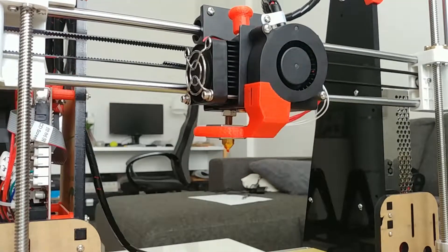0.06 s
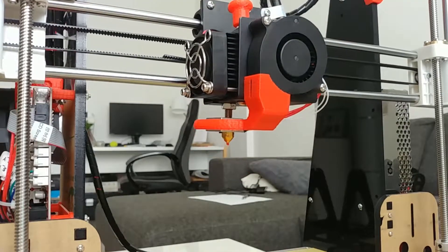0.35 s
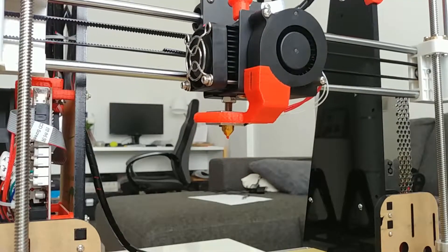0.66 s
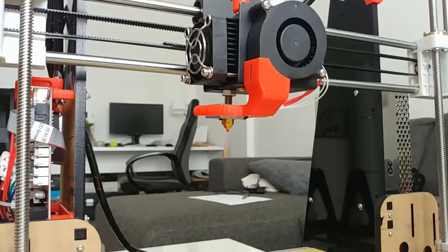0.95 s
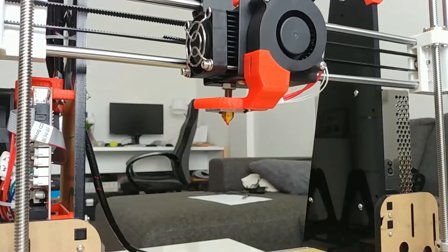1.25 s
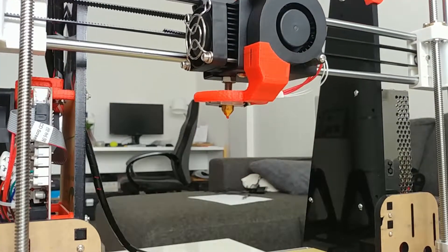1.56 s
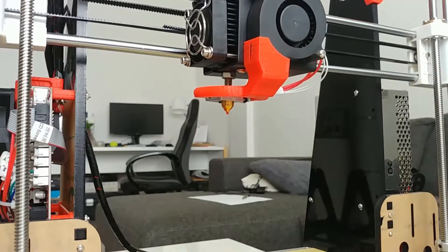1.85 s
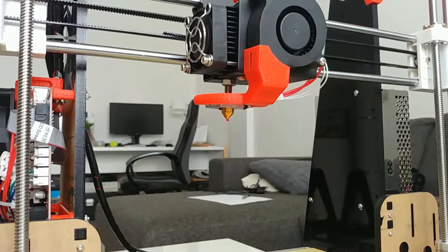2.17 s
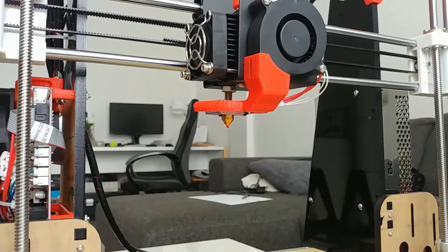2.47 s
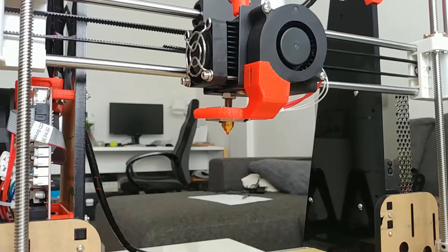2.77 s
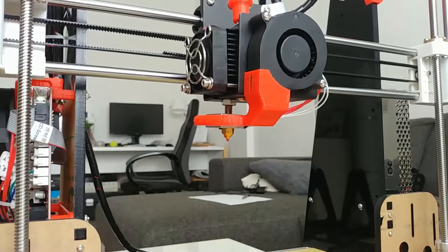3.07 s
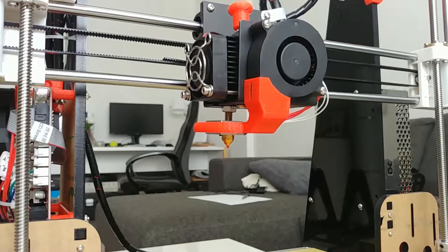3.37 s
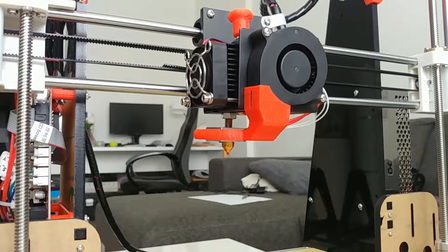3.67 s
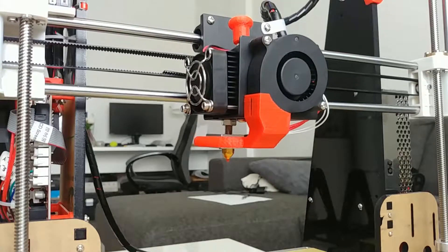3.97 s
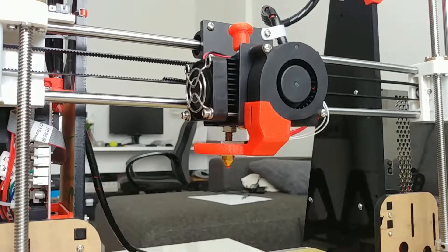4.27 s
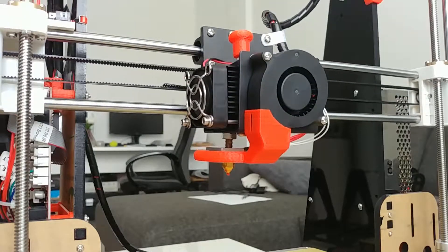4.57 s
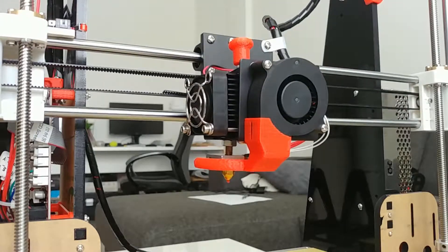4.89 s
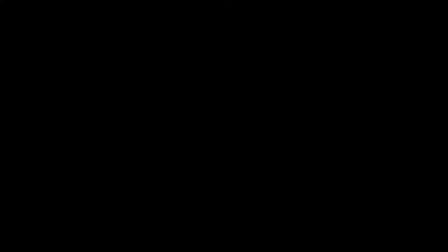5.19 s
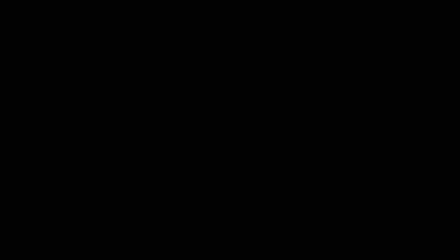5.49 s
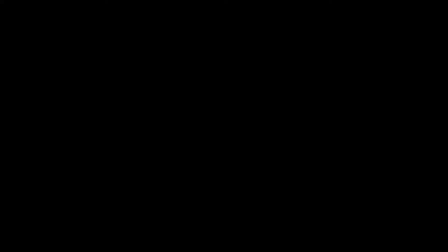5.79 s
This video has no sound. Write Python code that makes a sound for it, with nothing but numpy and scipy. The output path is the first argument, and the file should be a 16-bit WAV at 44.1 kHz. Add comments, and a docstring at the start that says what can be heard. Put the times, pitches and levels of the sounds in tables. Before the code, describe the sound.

A desktop 3D printer works close to the microphone in a room. Its stepper motors give a high, steady whine over a hum, while a small fan sings and blows. A few light clicks come early, the first with a faint low bump. Rubbing on the threaded rods swells as the carriage reaches the top and turns round. The whine carries on as it lowers, joined by a thin, slowly rising whistle.

```python
"""A high motor whine over a hum and a singing fan: a desktop 3D printer at work close by in a room.
It lifts its carriage on two threaded rods, turns round at 2 s and lowers it again. The stepper motors
hum at their step rate and whine at their microstep rate; a small fan sounds its shaft orders and blows
throughout, beside a thin rising whistle. The nuts rub on the rods, most near the top of the travel, and
the frame gives a few clicks and knocks, the first with a faint low bump."""
import sys
import numpy as np
from scipy import signal
from scipy.fft import rfft, irfft, next_fast_len
from scipy.io import wavfile
from scipy.ndimage import map_coordinates

SR = 44100
rng = np.random.default_rng(int(sys.argv[2]) if len(sys.argv) > 2 else 0)


def digitize_waveform(pressure):
    """Quantize a signal to 16-bit integers and store it at the path in sys.argv[1].

    Rows of a 2-D input are taken as channels; values are limited to [-1, 1].
    """
    field = np.atleast_2d(pressure).T
    bounded = np.clip(field, -1, 1)
    quanta = np.round(bounded * 32767).astype(np.int16)
    wavfile.write(sys.argv[1], SR, quanta)


N = 257367
TIME = np.arange(N) / SR

# Friction spectrum of the threads: f/Hz, relative density/dB
FRICTION_SPECTRUM = [(140, -35), (250, -12.5), (700, -15), (1300, 3.5), (1600, -1.5), (2500, -1),
                     (3800, -6.5), (5700, -2.5), (7500, -7), (15700, -17.5)]
# Modes of the carriage: f/Hz, bandwidth/Hz, relative level/dB
CARRIAGE_MODES = [(600, 110, -5.5), (783, 78, 0), (1053, 59, 4.5), (1248, 100, 3), (1755, 170, -14.5),
                  (2393, 250, -9), (3510, 200, -11.5), (4360, 300, -14), (6200, 760, -36)]


def amp(db):
    """Decibels to amplitude ratio."""
    return 10 ** (np.asarray(db) / 20)


def unit(x):
    """Normalisation to rms 1."""
    return x / np.sqrt(np.mean(x ** 2) + 1e-20)


def along(points, hz):
    """Interpolation of (f/Hz, value) points on a log frequency axis."""
    f, values = np.transpose(points)
    return np.interp(np.log(hz + 1), np.log(f + 1), values)


def curves(rows):
    """Linear interpolation in time of each column after t/s."""
    times, *columns = np.transpose(rows)
    return [np.interp(TIME, times, column) for column in columns]


def wobble(rate):
    """Smooth random modulation, rate knots a second."""
    knots = rng.standard_normal(int(N * rate / SR) + 4)
    return np.interp(TIME, TIME[::32], map_coordinates(knots, [TIME[::32] * rate]))


def filtered(x, response):
    """Linear filtering: the spectrum times a frequency response."""
    n = x.shape[-1]
    padded = next_fast_len(n + SR // 4)
    return irfft(rfft(x, padded) * response(np.fft.rfftfreq(padded, 1 / SR)), padded)[..., :n]


def shape(points):
    """Spectral envelope through (f/Hz, level/dB) points."""
    return lambda hz: amp(along(points, hz))


def resonances(modes):
    """Modal superposition: damped resonators of alternating sign."""
    return lambda hz: sum((-1) ** k * amp(db) * 1j * hz * width / (f * f - hz * hz + 1j * hz * width)
                          for k, (f, width, db) in enumerate(modes))


def low_cut(x, corner_hz=205):
    """High-pass filter: takes the deep bass out of the knocks and rubbing."""
    return signal.sosfilt(signal.butter(4, corner_hz, "high", fs=SR, output="sos"), x)


def placed(x, left_db):
    """Level difference: the machine stands nearer the right microphone."""
    return np.array([amp(left_db) * x, x])


def noise(colour, size=N):
    """Partially coherent stereo noise of rms 1, stronger on the right."""
    # Channel balance: f/Hz, left minus right/dB
    balance = [(60, -7.5), (200, -19.5), (400, -8), (1200, -8.5), (2400, -6.5), (8000, -6.5), (14000, -10)]
    # Likeness of the channels: f/Hz, correlation
    coherence = [(60, 0.37), (250, 0.35), (1000, 0.64), (2500, 0.24), (6000, 0.21), (14000, 0.093)]

    def mid_and_side(hz):
        angle = np.arccos(np.clip(along(coherence, hz), -1, 1)) / 2
        return colour(hz) * np.array([np.cos(angle), np.sin(angle)])

    mid, side = filtered(rng.standard_normal((2, size)), mid_and_side)
    pair = np.array([mid + side, mid - side])
    return unit(filtered(pair, lambda hz: placed(np.ones_like(hz), along(balance, hz))))


def swell(turns, depth_db, growth_db, crest, count=1):
    """Load modulation in dB: rods slightly out of true give count swells a turn."""
    return (depth_db + growth_db * turns) * np.cos(2 * np.pi * count * (turns - crest))


def steppers(step_hz=399.69, steps_per_turn=200, reverse_s=2.0, pause_s=0.0057):
    """Forced vibration at orders of the step rate; 16 microsteps a step make orders 16 and 32 strong."""
    # Motor partials: order, level going up/dB, level going down/dB, left minus right/dB
    partials = [(1, -41, -41, -19), (1.5, -50.5, -50, -15), (2, -47, -42, -9), (3, -52, -48, -23),
                (5, -61, -60, -7), (6, -66, -52.5, -15), (7, -61, -62, -4), (8, -66, -61, -8),
                (11, -60, -61, -16), (12, -58, -58, -21), (14, -55, -56, -17), (15, -54, -52, -22),
                (16, -34, -34, -13), (17, -54, -58, -9), (18, -60, -56, -2), (19, -55, -63, -5),
                (20, -59, -58, -8), (22, -61, -67, -13), (27, -54, -55.5, -16), (28, -54, -60, -9),
                (29, -56, -56, -11), (30, -64, -62, -2), (31, -49.5, -49.5, -16), (32, -28, -30, -21),
                (33, -44, -44, -13), (34, -53, -56, -7), (35, -59, -58, -11)]
    # Drift in how the frame carries the motors: t/s, gain/dB of step hum, whine and its octave
    transmission = [(0, 2, 2, -1), (.4, -2, 5.5, 0), (.62, -4.5, -1.5, 0), (.88, -0.5, -7, -2),
                    (1.28, -2.5, 3.5, -.5), (1.6, 0.5, -0.5, -2.5), (1.85, 4, 3, 2.5),
                    (2.35, -2, -6.5, -2.5), (3, -1.5, 0.5, -1), (3.6, -4, 3, 0), (4.05, 2, -2.5, -2),
                    (4.7, 1, -2, 0), (5.3, 0.5, 0.5, -2)]
    # Phase difference between the microphones: f/Hz, lead of the left/rad
    left_lead = [(1000, -1), (5600, 1.5), (6400, -2.5), (6800, -2), (7200, 1.5), (12800, -1.7),
                 (13200, -1.5), (13600, 2.8)]
    turns = abs(TIME - reverse_s) * step_hz / steps_per_turn  # rod turns below the top
    hum, whine, octave = curves(transmission)
    hum += swell(turns, depth_db=2, growth_db=-0.43, crest=0.33)
    hum += swell(turns, depth_db=2, growth_db=-0.5, crest=0.11, count=2) + 1.5 * wobble(12)
    whine += swell(turns, depth_db=1.5, growth_db=0, crest=0.42, count=2) + 0.98 * wobble(7)
    octave += swell(turns, depth_db=-2.15, growth_db=1.2, crest=0.15)
    octave += swell(turns, depth_db=-0.04, growth_db=0.32, crest=0.44, count=2) + 0.98 * wobble(7.5)
    drift_db = {1: hum, 16: whine, 31: octave + 1.5, 32: octave, 33: octave + 1.5}
    phase = 2 * np.pi * step_hz * TIME
    out = np.zeros((2, N))
    for order, up_db, down_db, left_db in partials:
        level = np.where(TIME < reverse_s, up_db, down_db)
        level = level + (drift_db[order] if order in drift_db else 2 * wobble(4.98) - 0.8)
        # uneven friction makes every line flutter in amplitude and phase
        size = np.sqrt(2) * amp(level) * (1 + 0.092 * wobble(130))
        angle = order * phase + 0.056 * wobble(51) + rng.uniform(0, 2 * np.pi)
        lead = along(left_lead, order * step_hz)
        out += size * np.array([amp(left_db) * np.sin(angle + lead), np.sin(angle)])
    coils = 1 + 0.051 * np.sin(phase / 4)  # the coil currents repeat every four steps
    running = np.clip(abs(TIME - reverse_s) / pause_s, 0, 1) ** 4  # brief standstill at the reversal
    return out * coils * running


def fan(shaft_hz=252.5, rise_hz_per_s=0.23, flutter=0.078, jitter=0.018, blade_db=-0.6, shake_db=-1.65):
    """Rotor harmonics of a small fan; its unbalance shakes the gantry more at some heights."""
    # Fan partials: shaft order, level/dB, left minus right/dB
    partials = [(1, -36, -15), (4, -35, -10), (5, -41, -8), (7, -48, -8), (8, -53, -20), (12, -58, -17),
                (14, -53.5, -9), (28, -63, 4), (32, -57, -5)]
    # Unbalance hum: t/s, relative level/dB
    unbalance = [(0, -42.5), (.5, -41.5), (.7, -50), (1, -47), (1.2, -39.5), (1.8, -37), (2.9, -38.5),
                 (4.5, -44.5), (5.3, -45.5)]
    phase = 2 * np.pi * np.cumsum(shaft_hz + rise_hz_per_s * TIME) / SR + jitter * wobble(25)
    shake, = curves(unbalance)
    out = np.zeros((2, N))
    for order, db, left_db in partials:
        level = db + (shake - np.mean(shake) + shake_db if order == 1 else blade_db)
        line = (1 + flutter * wobble(50)) * np.sin(order * phase + rng.uniform(0, 2 * np.pi))
        out += placed(np.sqrt(2) * amp(level) * line, left_db)
    return out


def whistle(start_hz=4194, rise_hz_per_s=37, gain_db=2.5, octave_db=-1.5):
    """A linear glide of a tone and its octave, probably a second fan's bearing gathering speed."""
    # Envelope of the whistle: t/s, relative level/dB
    envelope = [(0, -66), (.2, -55), (.4, -75), (2.2, -72), (2.7, -55), (3.5, -59), (5.3, -53.5)]
    db, = curves(envelope)
    phase = 2 * np.pi * np.cumsum(start_hz + rise_hz_per_s * TIME) / SR
    line = amp(db + gain_db + wobble(12)) * (np.sin(phase) + amp(octave_db) * np.sin(2 * phase))
    return placed(np.sqrt(2) * line, left_db=-10)


def hums(waver_rad=0.28):
    """Two weak phase-modulated hums, and a faint tone that sinks and fades at the start."""
    # Steady hums: f/Hz, level/dB, left minus right/dB
    drones = [(194.8, -52, -13), (270, -56, -10)]
    # Sinking tone: t/s, f/Hz, peak level/dB
    glide = [(0, 365, -60), (.06, 353, -36), (.11, 352, -37), (.15, 336, -34), (.19, 334, -68)]
    steady = np.zeros((2, N))
    for hz, db, left_db in drones:
        phase = 2 * np.pi * hz * TIME + waver_rad * wobble(3.4)
        steady += placed(np.sqrt(2) * amp(db) * np.sin(phase), left_db)
    hz, db = curves(glide)
    return steady + placed(amp(db) * np.sin(2 * np.pi * np.cumsum(hz) / SR), left_db=-12.5)


def fan_air(level_db=-37.5):
    """Broadband flow noise of the air that the fan blows."""
    # Spectrum of the airflow: f/Hz, relative density/dB
    spectrum = [(30, -10), (100, -8), (160, -6), (220, 5.5), (400, -5.5), (1300, -4), (2200, 1),
                (4500, -2.5), (8000, -2), (11000, 0), (13200, 2), (15700, 1)]
    return amp(level_db + 0.46 * wobble(3.7)) * noise(shape(spectrum))


def rubbing(frame_db=-42, ring_db=-1, slip_db=2.55):
    """Stick-slip friction: the nuts hiss and ring the carriage, while the frame trembles in its modes."""
    # Friction of the nuts on the rods: t/s, level/dB
    friction = [(0, -49), (.7, -51), (1.2, -47), (1.6, -47), (1.82, -39.5), (2.02, -36.5), (2.1, -49.5),
                (2.5, -46), (4.6, -48), (5.3, -46)]
    # Modes of the frame: f/Hz, bandwidth/Hz, relative level/dB
    frame_modes = [(285, 96, 3), (391, 36, 6), (476, 44, 3), (784, 172, -0.5), (988, 91, 1),
                   (1039, 61, -3.5), (1227, 89, -3.5), (1863, 243, -4.5), (2230, 170, -16)]
    rub_db, = curves(friction)
    tremble_db = frame_db + 0.27 * (rub_db - np.mean(rub_db)) + 0.54 * wobble(18)
    tremble = amp(tremble_db) * noise(resonances(frame_modes))
    slips = amp(rub_db + slip_db * wobble(220))
    hiss = noise(shape(FRICTION_SPECTRUM))
    ring = amp(ring_db) * noise(resonances(CARRIAGE_MODES))
    return low_cut(tremble + slips * (hiss + ring))


def knocks(attack_s=0.00039, push_s=0.00008, focus_db=37):
    """Impact excitation: from soft to hard, the frame thuds, carriage clacks, threads scuff, rods tick."""
    # Contacts: t/s, strength/dB, hardness (0 a dull thud, 1 a steel tick)
    contacts = [(.5848, -14, 0.96), (0.586, -22.5, 0.2), (0.593, -19, .97), (.5995, -26.5, 0.84),
                (0.782, -29.5, 0.91), (.788, -25, 0.12), (1.035, -20, 0.83), (1.0375, -20.5, 0.27),
                (1.0421, -19, .33), (1.051, -24, 0.59), (1.0525, -15, 1), (1.0611, -21, 0.97),
                (1.585, -25.5, 0.55), (1.611, -28, .66), (1.991, -27.5, 0.62), (2.004, -24, 0.14),
                (2.006, -21, .67), (2.018, -25, .55), (2.156, -36, 0.82), (2.393, -30, .02),
                (2.905, -29, 0.056), (5.088, -27, .1), (5.188, -26.5, 0.086)]
    # Thud of the frame: f/Hz, relative density/dB
    thud_spectrum = [(60, -19), (160, -29.5), (230, 2), (310, 7), (450, -4), (620, -8), (900, -30),
                     (3000, -46.5)]
    # Tick of the steel rods: f/Hz, relative density/dB
    tick_spectrum = [(500, -28), (2500, -19.5), (6000, -10.5), (9000, 2), (10500, 6), (12000, 3.5),
                     (14000, 13.5), (15700, 7)]
    t = np.arange(SR // 5) / SR

    def burst(spectrum, t60):
        """Exponentially decaying noise with the energy of its envelope."""
        envelope = 10 ** (-3 * t / t60) * (1 - np.exp(-t / attack_s))
        return unit(envelope * noise(shape(spectrum), size=len(t))) * np.sqrt(np.mean(envelope ** 2))

    push = np.exp(-t / push_s)  # its finite length mellows the clack
    clack = unit(placed(filtered(push, resonances(CARRIAGE_MODES)), left_db=-13))
    out = np.zeros((2, N + SR))
    for onset_s, db, hardness in contacts:
        start = round(onset_s * SR)
        parts = [amp(-1) * burst(thud_spectrum, t60=0.09),
                 amp(-15) * clack,
                 amp(-2) * burst(FRICTION_SPECTRUM, t60=0.045),
                 amp(-0.3) * burst(tick_spectrum, t60=0.054)]
        # each part answers best to one hardness and loses focus_db per unit away from it
        for best, part in zip(np.linspace(0, 1, len(parts)), parts):
            out[:, start:start + len(t)] += amp(db - focus_db * abs(hardness - best)) * part
    return low_cut(out[:, :N])


def jolt(onset_s=0.586, level_db=-38.5, hz=48, t60=0.09):
    """Damped oscillation: the first click jolts the microphones into a low bump."""
    t = np.maximum(TIME - onset_s, 0)
    bump = amp(level_db) * np.sin(2 * np.pi * hz * t) * 10 ** (-3 * t / t60)
    return placed(bump, left_db=-14.5)


def room(x):
    """Reverberation: convolution with a short diffuse tail, different at each microphone."""
    # Reverberation time of a living room: f/Hz, T60/s
    decay_times = [(200, 0.96), (2000, 0.14), (12000, 0.3)]
    hz, t, bands = signal.stft(rng.standard_normal((2, SR // 2)), SR, nperseg=256)
    decay = 10 ** (-3 * t / along(decay_times, hz)[:, None])
    _, tail = signal.istft(bands * decay, SR, nperseg=256)
    return signal.fftconvolve(x, tail / np.linalg.norm(tail[0]), axes=1)[:, :N]


def scene():
    """Superposition of the printer's sources, with reverberation on the knocks."""
    hits = knocks()
    running = steppers() + fan() + whistle() + hums() + fan_air() + rubbing()
    return running + hits + jolt() + amp(-8) * room(hits)


def record(dry, stop_s=5.333, top_hz=15800):
    """Gating and band limiting: the sound ends abruptly and loses its highest treble."""
    gate = np.clip((stop_s - TIME) / 0.002, 0, 1)
    return filtered(dry * gate, lambda hz: np.clip((top_hz - hz) / 100 + 0.5, 0, 1))


dry = scene()
out = record(dry)
digitize_waveform(out)
```